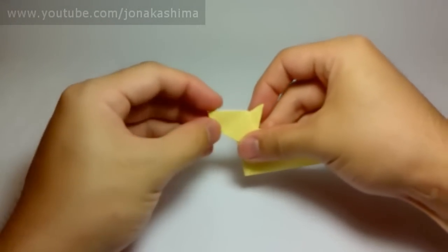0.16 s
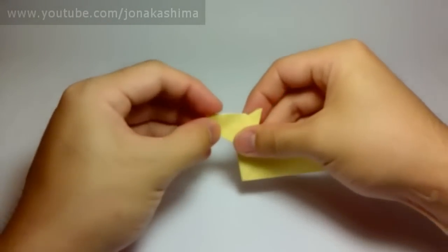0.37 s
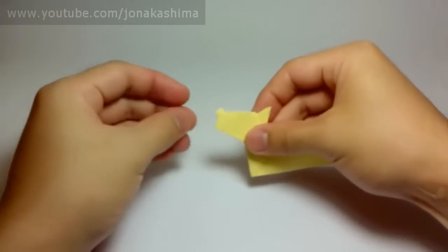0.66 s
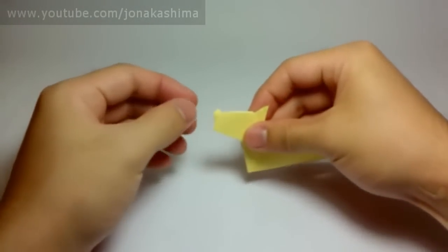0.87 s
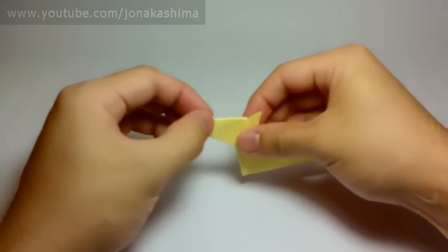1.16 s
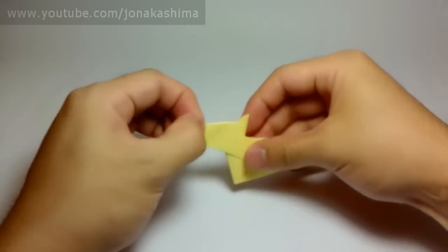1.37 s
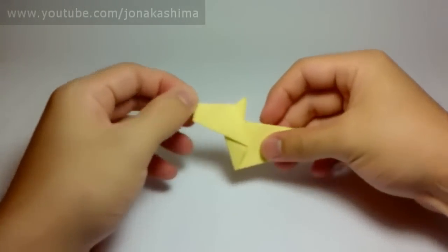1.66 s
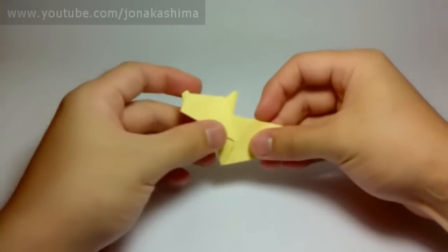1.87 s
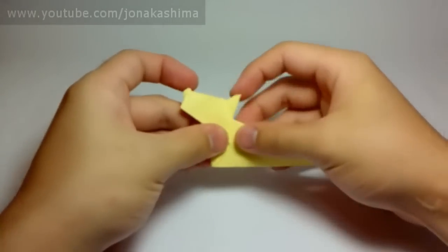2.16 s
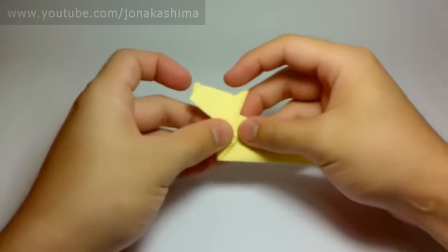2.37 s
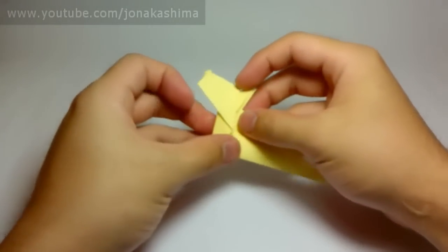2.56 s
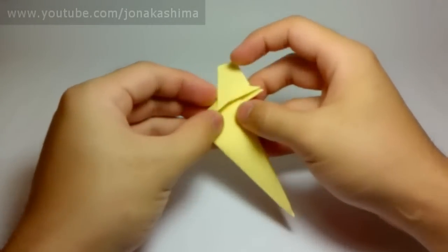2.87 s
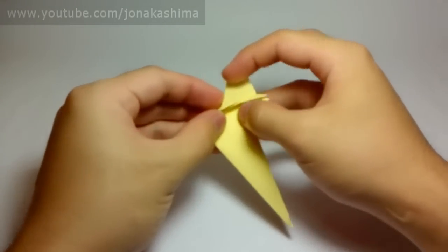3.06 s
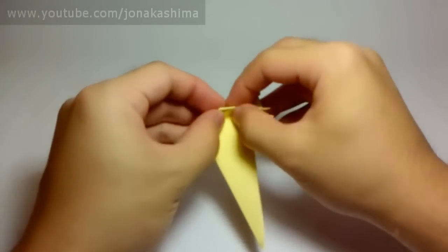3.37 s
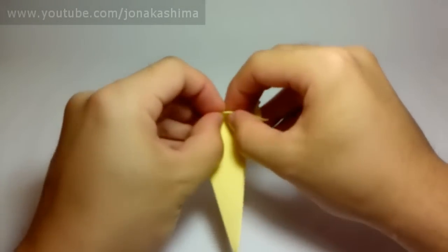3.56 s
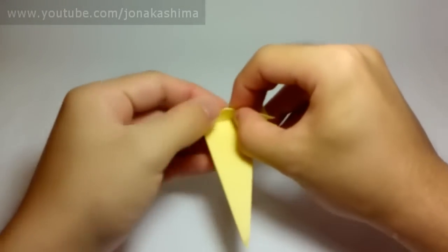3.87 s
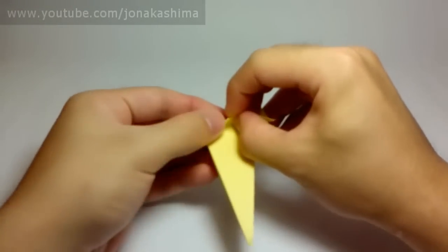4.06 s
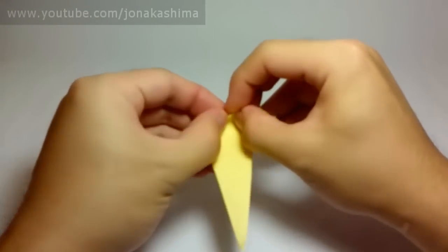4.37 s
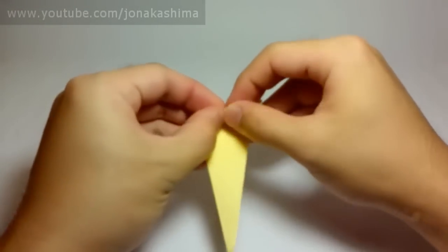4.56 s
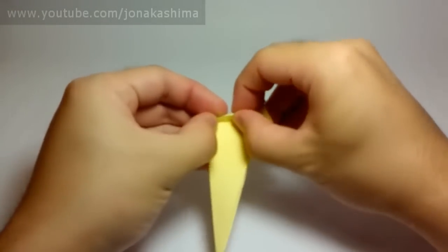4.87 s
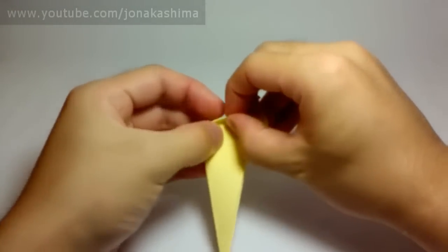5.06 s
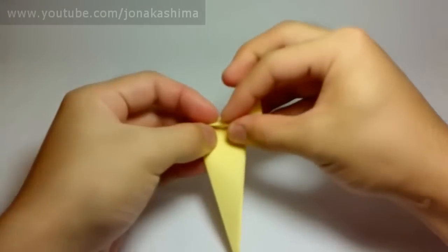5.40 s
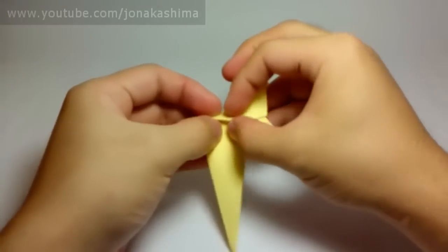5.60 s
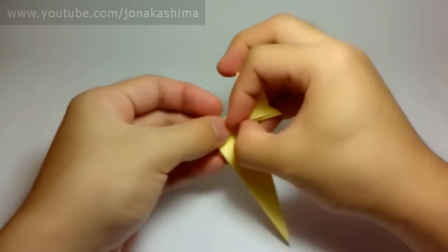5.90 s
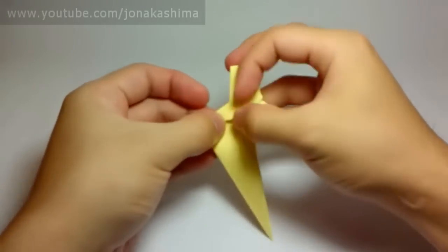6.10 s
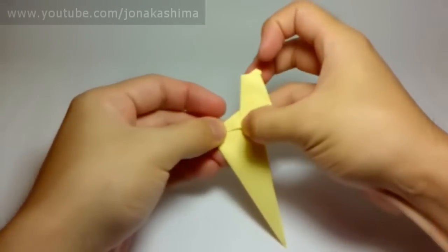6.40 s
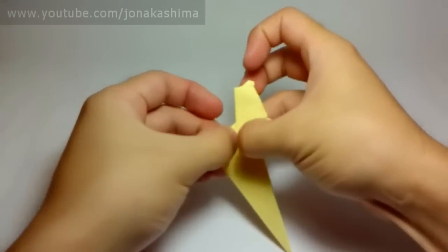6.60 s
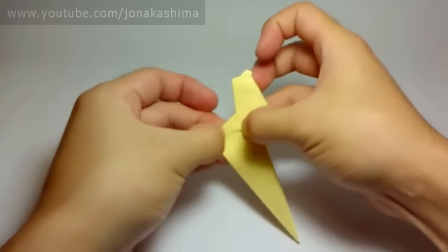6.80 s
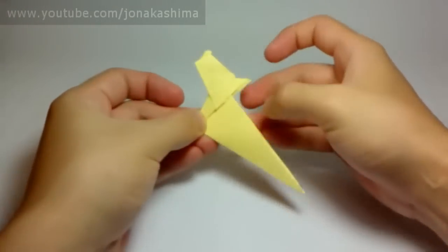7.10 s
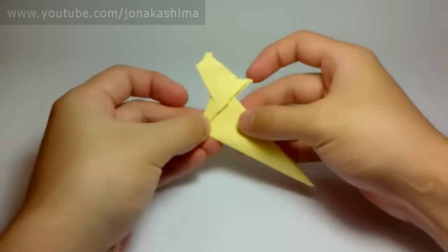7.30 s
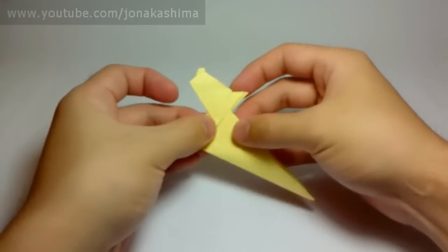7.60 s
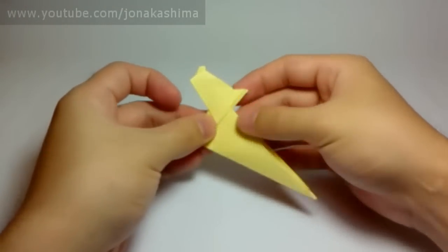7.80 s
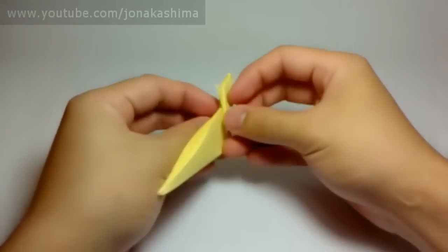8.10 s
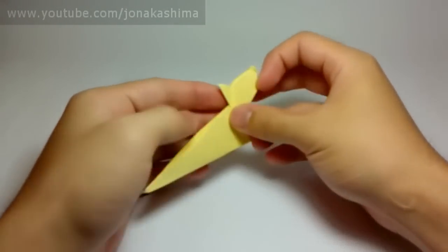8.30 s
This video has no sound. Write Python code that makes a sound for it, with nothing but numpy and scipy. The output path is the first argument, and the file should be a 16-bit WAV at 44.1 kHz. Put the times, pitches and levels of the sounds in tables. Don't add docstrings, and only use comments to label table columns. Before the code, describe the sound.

Fingers fold a small piece of stiff paper very close to the microphone in a quiet room. Light rustling leads to a loud sharp crack near two seconds, then soft sliding, a busy run of crisp crease scratches and small snaps, a second big crack past six seconds, and scattered crackles to the end over faint hiss.

```python
import sys
import numpy as np
from scipy import signal
from scipy.fft import rfft, irfft, next_fast_len
from scipy.io import wavfile
from scipy.ndimage import uniform_filter1d

SR = 44100
rng = np.random.default_rng(int(sys.argv[2]) if len(sys.argv) > 2 else 0)


def attenuation_scalar(level_db):
    decades = np.asarray(level_db, float) / 20
    return 10 ** decades


def master_out(mix):
    frames = np.transpose(np.atleast_2d(mix))
    ceiling = np.clip(frames, -1, 1)
    pcm = np.round(ceiling * 32767).astype(np.int16)
    wavfile.write(sys.argv[1], SR, pcm)


N = 372644
FLUTTER_T60_S = 0.061

# (frequency [Hz], gain [dB])
POCKET_TONE = [(4300, -80), (4900, -4.5), (5300, 2), (5700, 2.5), (6300, 0), (6800, -12), (7400, -11.5),
               (8200, -23.5), (9500, -75.5)]
# (frequency [Hz], gain [dB])
FOLD_TONE = [(3300, -65.5), (3750, -25.5), (4250, 4), (4800, 3.5), (5200, 11.5), (5900, -65)]
# (frequency [Hz], gain [dB])
SKIN_TONE = [(5800, -93), (6800, 3.5), (7300, 0), (8300, 0), (9500, -2), (10500, -1), (11300, -7)]
# (frequency [Hz], gain [dB])
FLAP_TONE = [(500, -65), (1100, -20.5), (1900, -9), (2300, -6.5), (2600, -3), (3000, -4), (3450, -4),
             (4000, -1), (4700, -69.5)]


def unit(x):
    return x / np.sqrt(np.mean(x ** 2) + 1e-20)


def response(points):
    hz, db = np.transpose(points)
    grid = np.fft.rfftfreq(8192, 1 / SR)
    gain_db = np.interp(np.log(grid + 1), np.log(hz), db)
    cepstrum = irfft(np.log(attenuation_scalar(gain_db) + 1e-6))
    cepstrum[1:4096] *= 2
    cepstrum[4097:] = 0
    return unit(irfft(np.exp(rfft(cepstrum)))) / np.sqrt(len(cepstrum))


def coloured(x, points):
    return signal.oaconvolve(x, response(points))[:len(x)]


def curves(rows, outside_db=-140):
    s, *columns = np.transpose(rows)
    t = np.arange(N) / SR
    return [np.interp(t, s, column, outside_db, outside_db) for column in columns]


def swells(rows, peak_db, swing=1):
    peak_s, rise, fall = np.transpose(rows)[:3, :, None]
    t = np.arange(0, N / SR + .001, .001)
    distance = np.maximum((peak_s - t) / abs(rise), (t - peak_s) / abs(fall))
    slope_db = -20 * distance ** 1.13
    gain = attenuation_scalar(peak_db[:, None] + swing * slope_db).sum(0)
    return np.interp(np.arange(N) / SR, t, gain)


def patchy(x, depth_db, wide=3, long=9):
    z = signal.stft(x, nperseg=512)[2]
    field = uniform_filter1d(rng.standard_normal(z.shape), int(wide), 0)
    field = uniform_filter1d(field, int(long), 1)
    return unit(signal.istft(z * attenuation_scalar(depth_db * unit(field)), nperseg=512)[1][:N])


def slips(rate, spread_db, smooth):
    happens = rng.random(N) < rate / SR
    size = attenuation_scalar(spread_db * np.minimum(rng.exponential(size=N), 3))
    direction = np.sign(rng.standard_normal(N))
    rub = rng.standard_normal(N)
    return unit(unit(happens * size * direction) + smooth * rub)


def sheet(drive, gains, depth_db):
    ring, skin, flap = gains
    fold = attenuation_scalar(-3.0) * ring / (1 + 0.18 * skin / (ring + 1e-12))
    parts = zip([POCKET_TONE, FOLD_TONE, SKIN_TONE, FLAP_TONE], [ring, fold, skin, flap])
    return sum(gain * patchy(coloured(drive, tone), depth_db) for tone, gain in parts)


def flutter_kick(t, flutter_db):
    kick = attenuation_scalar(flutter_db - 60 * t / FLUTTER_T60_S) * rng.standard_normal(len(t))
    kick[0] = 1
    return kick


def hush():
    # (frequency [Hz], level per Hz [dB])
    hush_tone = [(18, -35), (30, -15), (60, -16), (85, -7.5), (140, -3), (215, -10.5), (490, -5.5),
                 (600, -3), (1200, -2), (1350, 0), (1530, -2), (4000, -3.5), (9700, -12.5), (11200, -12)]
    return attenuation_scalar(-59) * patchy(coloured(rng.standard_normal(N), hush_tone), depth_db=1.0)


def handling():
    # (peak time [s], rise [s], fall [s], rustle level [dB])
    touches = [(0.147, .035, .067, -49), (.41, .016, 0.1, -52.5), (0.723, 0.13, 0.028, -48.5),
               (1.188, .03, 0.095, -59), (1.334, .04, .05, -59), (1.47, 0.022, 0.24, -50.5),
               (1.754, 0.1, 0.01, -52), (1.83, 0.065, 0.065, -46), (1.9, 0.034, 0.16, -56.5),
               (2.08, 0.041, 0.024, -53), (2.378, .026, 0.16, -52), (2.516, 0.016, .5, -55.5),
               (2.976, 0.46, 0.034, -55.5), (3.14, 0.3, 0.11, -52.5), (3.274, 0.011, 0.34, -53),
               (3.89, .06, 0.077, -55.5), (4.194, 0.018, 0.055, -53), (4.308, 0.0074, 0.22, -54),
               (5.14, 0.9, .03, -57), (5.31, .025, 0.12, -55), (5.38, 0.16, 0.058, -57),
               (5.576, 0.022, .4, -59), (5.992, 0.015, 0.025, -53), (6.8, .05, .1, -54.5),
               (6.856, 0.028, 0.1, -53), (7.23, 0.22, 0.034, -66), (7.485, 0.13, .5, -56),
               (7.79, 0.46, 0.031, -58), (7.926, 0.23, .05, -59.5), (8.104, 0.17, 0.009, -53)]
    part_db = [[-6.5], [-7], [-11.5]]
    gains = swells(touches, np.transpose(touches)[3]) * attenuation_scalar(part_db)
    return sheet(slips(rate=2500, spread_db=4.0, smooth=1.13), gains, depth_db=3.3)


def squeak():
    # (time [s], level [dB])
    whistle = [
        (4.66, -78),
        (4.76, -62),
        (4.8, -62),
        (4.89, -74),
        (4.925, -43.5),
        (4.97, -57.5),
        (5.04, -61),
        (5.11, -57),
        (5.135, -74),
    ]
    db, = curves(whistle)
    waver = unit(uniform_filter1d(rng.standard_normal(N), 1500))
    tone = np.sin(2 * np.pi * 5917 * np.arange(N) / SR)
    return np.sqrt(2) * attenuation_scalar(db + 1.3 * waver) * tone


def hollows():
    # (middle time [s], half length [s], frequency
    # [Hz], level [dB])
    cavities = [(5.183, 0.039, 7100, -43), (1.072, .12, 8500, -64.5), (1.12, 0.12, 4600, -65.5),
                (6.941, 0.02, 5900, -38.5), (1.57, .01, 1800, -56), (3.189, 0.011, 3030, -44),
                (4.599, 0.018, 4230, -43), (6.214, 0.022, 4470, -50), (6.318, 0.058, 8200, -47),
                (6.348, 0.033, 2610, -55.5), (6.733, 0.042, 4420, -52), (6.733, 0.039, 2260, -57.5),
                (6.943, 0.033, 3580, -54), (8.3, 0.12, 2750, -74), (8.392, 0.02, 1440, -50.5),
                (6.464, .011, 134, -63), (1.804, 0.012, 2800, -57), (1.16, .05, 1300, -65),
                (1.195, .02, 2370, -61), (6.05, .01, 2060, -57), (6.085, .012, 2700, -55),
                (.155, .025, 4300, -64), (.955, .012, 2630, -60), (7.22, .022, 3100, -60),
                (7.148, .018, 4900, -48), (3.187, 0.016, 6730, -39.5), (3.19, 0.015, 10300, -36),
                (8.008, 0.015, 7100, -50), (8.317, 0.061, 6650, -49.5), (8.394, 0.013, 4750, -34)]
    out = np.zeros(N + SR)
    for s, half, hz, db in cavities:
        t = np.arange(-3 * half, 3 * half, 1 / SR)
        tune = signal.butter(1, [hz * .97, hz * 1.03], "band", fs=SR)
        rub = rng.standard_normal(SR // 2 + SR // 4)
        song = unit(signal.lfilter(*tune, rub)[:len(t)])
        out[round((s - 3 * half) * SR):][:len(t)] += attenuation_scalar(db - 12.0 * (t / half) ** 4) * song
    return out[:N]


def snaps():
    # (time [s], peak [dB], treble [dB], low [dB], thud [dB])
    pops = [(0.623, -38.5, -10.5, -20, -28), (.8614, -48.5, -9, -18, -31), (0.9436, -57, -10.5, 0, -19),
            (4.608, -28, -25, -37, -60), (4.588, -24, -32, -46, -57), (4.6702, -37.5, -17, -22, -38),
            (4.696, -42, -9, -24, -50), (5.145, -31, -34, -27, -50), (5.1585, -12.5, -27, -42, -69),
            (6.0743, -20.5, -16.5, -23.5, -40), (6.1595, -50.5, -6, -3, -21), (6.2805, -37, -8, -30, -50),
            (6.909, -40, -12, -13, -40), (7.14, -21.5, -15, -28, -46), (8.3426, -22, -21, -18, -39),
            (8.3795, -27, -8, -8, -50), (8.388, -28, -1, -10, -50), (8.4025, -32, -20, -11, -47),
            (3.1824, -36, -3, -13, -50)]
    # (frequency [Hz], gain [dB])
    thud_tone = [(200, -54), (400, -16), (620, 16), (800, -1), (1100, 1), (1500, -69)]
    out, t = np.zeros(N + SR), np.arange(SR // 8) / SR
    tones = (POCKET_TONE, FOLD_TONE, SKIN_TONE, FLAP_TONE, thud_tone)
    bodies = np.array([response(tone) for tone in tones])
    for s, db, treble_db, low_db, thud_db in pops:
        kick = flutter_kick(t, flutter_db=-22)
        body = attenuation_scalar([9, 5, treble_db + 18.5, low_db + 20, thud_db + 19.0]) @ bodies
        out[round(s * SR):][:len(t)] += attenuation_scalar(db) * signal.fftconvolve(kick, body)[:len(t)]
    return out[:N]


def panels():
    # (time [s], crack level [dB], ringing level [dB])
    buckles = [
        (1.8367, -3, -32.5),
        (6.4445, -2, -34),
    ]
    # (frequency [Hz], gain [dB])
    crack_tones = [
        [(500, -58), (1200, -24), (2200, -7), (3500, -17.5), (4400, -5), (5600, 0.5), (7000, -10.5),
         (10500, -45)],
        [(330, -50), (620, -14.5), (1800, -18.5), (2500, -2.5), (5000, 0.5), (6000, -5), (7500, -4),
         (11000, -10)],
    ]
    # (frequency [Hz], level [dB], time to fade by 60 dB [s])
    panel_pitches = [
        [(2200, -5, .03), (3060, 0.5, .05), (4220, -2, 0.05), (4860, -3, .03)],
        [(2580, -6, .03), (3570, -2, .06), (4980, 3, .04), (7200, -5, .05)],
    ]
    out, t = np.zeros(N), np.arange(SR // 10) / SR
    onset = 1 - np.exp(-(t / .0006) ** 2)
    for (s, crack_db, ring_db), tone, pitches in zip(buckles, crack_tones, panel_pitches):
        crack = coloured(flutter_kick(t, flutter_db=-23), tone)
        ring = sum(attenuation_scalar(db - 60 * t / t60) * np.sin(2 * np.pi * hz * t) for hz, db, t60 in pitches)
        out[round(s * SR):][:len(t)] += attenuation_scalar(crack_db) * crack + attenuation_scalar(ring_db) * ring * onset
    return out


def strokes():
    # (peak time [s], rise [s], fall [s], ring [dB], skin hiss over ring [dB])
    creases = [(3.346, 0.028, 0.14, -58.5, -3), (3.436, 0.023, 0.14, -43.5, -5),
               (3.52, 0.24, 0.039, -49, -9), (3.625, 0.04, 0.045, -50, -11.5),
               (3.705, 0.032, 0.057, -42, -16), (3.735, 0.042, 0.048, -36.5, -22),
               (3.911, 0.011, 0.034, -48.5, -9), (3.93, 0.028, 0.072, -38, -10),
               (4.03, 0.015, 0.028, -42, -4.5), (4.078, 0.039, .13, -47, -4.5),
               (4.608, 0.031, 0.036, -31.5, -18.5), (4.701, 0.012, 0.037, -48, -4.5),
               (4.729, 0.033, 0.023, -43, -16), (4.79, 0.012, 0.27, -67.5, -11),
               (4.937, 0.16, .03, -48.5, -6), (5.161, 0.0072, 0.043, -29.5, -13),
               (5.2, 0.057, 0.098, -38, -8.5), (5.42, 0.028, 0.036, -39.5, -16),
               (5.47, 0.031, 0.1, -39.5, -17), (5.64, 0.13, 0.018, -55.5, -6),
               (5.725, 0.076, 0.058, -50, -7.5), (5.85, 0.077, .045, -42.5, -5),
               (6.033, 0.011, 0.1, -45, -12), (6.103, 0.087, 0.036, -40, -8)]
    slides = [(.445, 0.052, 0.053, -52, -0.5), (1.577, 0.076, 0.041, -39.5, 4), (1.63, 0.045, 0.06, -51, 2),
              (2.073, 0.022, 0.032, -55, -3), (2.175, .04, 0.12, -54, 0), (2.262, .015, 0.056, -55.5, 2),
              (2.32, 0.04, 0.028, -48, 3.5), (2.516, 0.014, 0.12, -57.5, -13),
              (2.75, 0.037, 0.049, -54, -2.5), (2.855, .025, .2, -58, 3), (3.187, 0.039, 0.051, -44, 7),
              (5.02, 0.11, 0.063, -56, -5), (6.281, 0.011, .08, -47.5, -6),
              (6.346, 0.035, 0.045, -34.5, -3), (6.515, .04, .3, -66, 6), (6.645, 0.27, 0.029, -55, -4),
              (6.909, .006, 0.052, -48.5, 7.5), (6.938, 0.048, 0.14, -46, -3),
              (7.762, 0.034, 0.076, -57, 5), (8.011, 0.063, 0.035, -48, 4.5)]
    openings = [(.958, 0.022, .1, -63, 0), (1.2, 0.13, 0.073, -59, -2), (2.035, .02, 0.05, -58, -8),
                (2.79, 0.056, 0.094, -61, -10), (6.205, 0.013, 0.04, -53.5, 6),
                (6.223, 0.032, 0.03, -45.5, -8), (6.436, 0.033, 0.063, -43.5, -1),
                (6.735, 0.078, 0.067, -49.5, -1), (7.114, 0.042, .08, -48, 2.5),
                (7.147, 0.014, 0.037, -51, -8), (7.225, .04, .04, -59, -14), (8.2, 0.01, .07, -46.5, -3.5),
                (8.263, 0.014, .15, -50.5, -3), (8.33, .15, 0.068, -53.5, -9),
                (8.391, 0.049, 0.056, -35.5, -3)]
    # (base level [dB], share of ring level [dB per dB])
    flap_follow = [
        (-62, 0.22),
        (-60, 0.63),
        (-54.5, 0.75),
    ]
    swing = 0.97
    gains = np.zeros((3, N))
    for rows, (base_db, share) in zip([creases, slides, openings], flap_follow):
        ring_db, skin_db = np.transpose(rows)[3:]
        ring = swells(rows, ring_db)
        skin = swells(rows, ring_db + skin_db, swing)
        flap = swells(rows, base_db + share * (ring_db + 49.5), swing)
        gains += [ring, skin, flap]
    return sheet(slips(rate=2000, spread_db=3.5, smooth=1.0), gains, depth_db=2.9)


def scene():
    return (hush() + handling() + squeak() + hollows() + snaps() + panels() + strokes())[None]


def band_limit(x):
    return signal.sosfilt(signal.butter(12, 15650, fs=SR, output="sos"), x)


def record(dry):
    # (frequency [Hz], rms level [dB])
    clock_tones = [(12403, -105), (13781, -104), (15159, -109)]
    size = next_fast_len(N + SR // 4)
    hz = np.fft.rfftfreq(size, 1 / SR)
    spectrum = rfft(dry, size) * attenuation_scalar(-np.clip((hz - 11020) / 2.0, 0, 90))
    limited = irfft(spectrum, size)[:, :N]
    treble = irfft(spectrum * (hz > 9000), size)[:, :N]
    bright = uniform_filter1d(treble ** 2, 1024)
    audible = uniform_filter1d(1. * (bright < attenuation_scalar(-55) ** 2), 256)
    t = np.arange(N) / SR
    tones = sum(np.sqrt(2) * attenuation_scalar(db) * np.sin(2 * np.pi * tone_hz * t) for tone_hz, db in clock_tones)
    hiss = attenuation_scalar(-78.5) * rng.standard_normal(N)
    return band_limit(limited + audible * (hiss + tones))


dry = scene()
out = record(dry)
master_out(out)
```